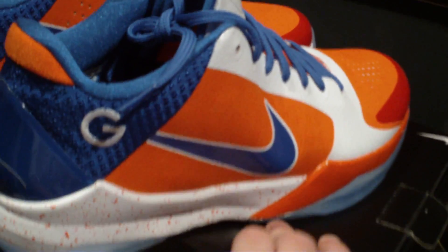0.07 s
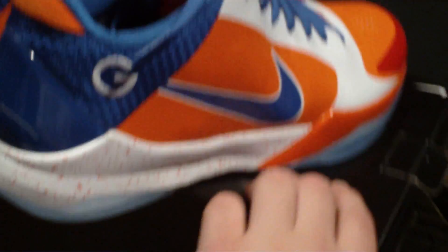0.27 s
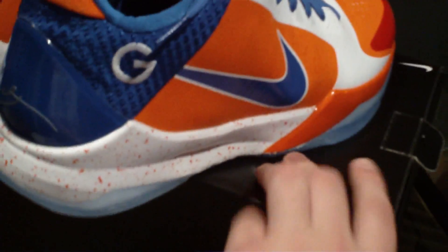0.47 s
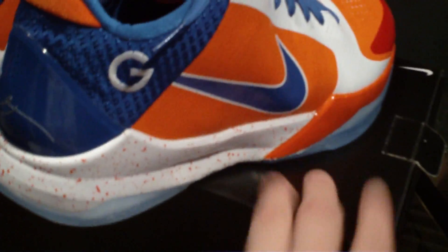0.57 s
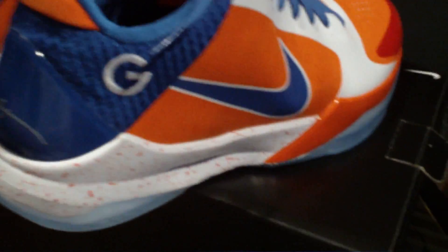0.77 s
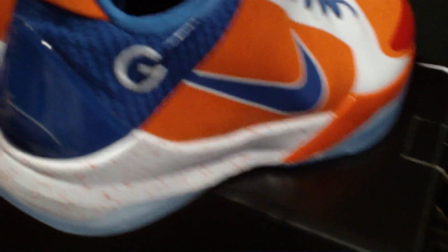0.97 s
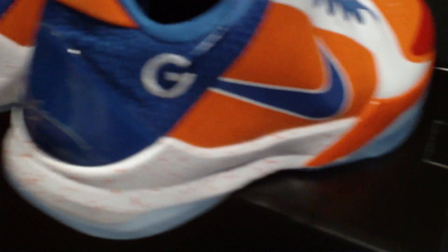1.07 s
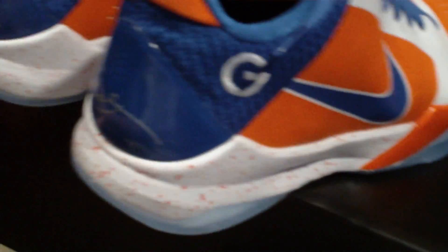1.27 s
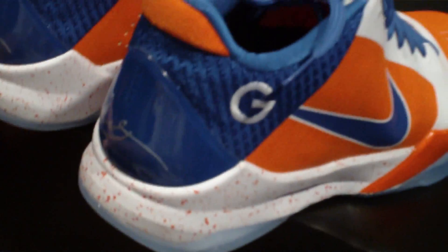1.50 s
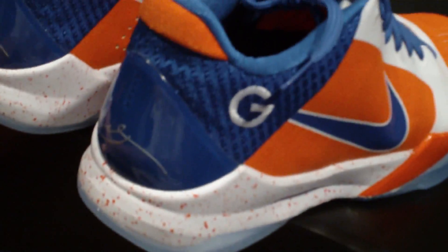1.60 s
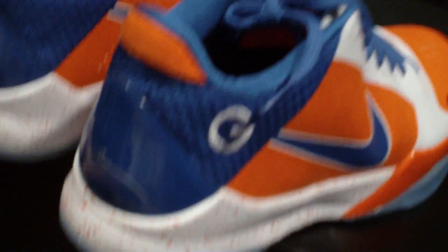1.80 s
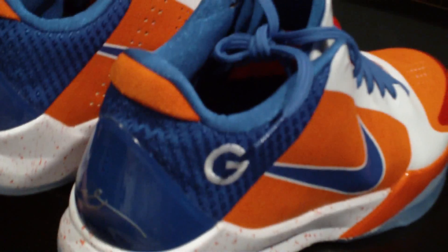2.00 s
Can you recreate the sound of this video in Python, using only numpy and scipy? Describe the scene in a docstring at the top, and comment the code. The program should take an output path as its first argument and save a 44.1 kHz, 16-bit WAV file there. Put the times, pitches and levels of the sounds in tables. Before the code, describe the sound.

Light hollow knocks and a brief rubbery scrape as a sneaker shifts on a cardboard box.

```python
"""A sneaker on a shoebox

A hand shifts and turns a sneaker on a hollow shoebox lid. Fingers bump the lid and make it ring.
The rubber sole catches, scrapes with a brief rough squeak and knocks down twice. Softer nudges
and rubs follow; each rub is thousands of tiny slips a second. Behind it all is a quiet room
with steady noise, hiss and the faint hum and whine of a fan."""
import sys
import numpy as np
from scipy import signal
from scipy.fft import rfft, irfft
from scipy.io import wavfile

SR = 44100
rng = np.random.default_rng(int(sys.argv[2]) if len(sys.argv) > 2 else 0)


def pcm_store(signal):
    """Save signal as 16-bit PCM."""
    levels = np.round(np.clip(np.atleast_2d(signal), -1, 1) * 32767)
    wavfile.write(sys.argv[1], SR, levels.astype(np.int16).T)


N = 90404
TIME = np.arange(N) / SR
JUDDER_PER_S = 140  # how fast the rubber's grip trembles


def from_db(db):
    """Turn decibels into a number to multiply by."""
    return 10 ** (np.asarray(db) / 20)


def unit_level(x):
    """Scale a sound so its average (rms) level is 1."""
    return x / np.sqrt(np.mean(x ** 2) + 1e-20)


def cut(x, hz, keep="low", order=2):
    """Keep the low or the high side of hz; a higher order cuts more steeply."""
    return signal.sosfilt(signal.butter(order, hz, keep, fs=SR, output="sos"), x + 1e-18)


def colour(x, spectrum):
    """Shape a sound's bass and treble with (pitch_hz, level_db) points, then set its level to 1."""
    hz, db = np.transpose(spectrum)
    bins = np.maximum(np.fft.rfftfreq(N, 1 / SR), 1)
    gains = from_db(np.interp(np.log(bins), np.log(hz), db))
    return unit_level(irfft(rfft(x) * gains, N))


def drift(per_s):
    """A smooth random wobble with a typical size of 1."""
    smoothing = 1 + (np.fft.rfftfreq(N, 1 / SR) / per_s) ** 2
    return unit_level(irfft(rfft(rng.standard_normal(N)) / smoothing, N))


def ring(x, hz, fade_s):
    """Each click in x rings as one pure tone that drops 60 dB in fade_s."""
    decay, angle = from_db(-60 / (fade_s * SR)), 2 * np.pi * hz / SR
    return signal.lfilter([0, np.sin(angle)], [1, -2 * decay * np.cos(angle), decay ** 2], x + 1e-18)


def dying_noise(fade_s):
    """A burst of noise that drops 60 dB in fade_s."""
    return rng.standard_normal(N) * np.exp(-np.minimum(np.log(1000) * TIME / fade_s, 50))


def stroke(start_s, length_s, rise_s=0.0032, fall_s=0.0092):
    """The loudness of one rub: it rises, holds and dies away."""
    rise = np.clip((TIME - start_s) / rise_s, 0, 1)
    return rise * np.exp(-np.maximum(TIME - start_s - length_s, 0) / fall_s)


def small_lid(x):
    """The lid is too small to give off much deep bass."""
    return cut(x, 166, "high", order=3)


# The low tones of the whole lid flexing: pitch_ratio, level_db, fade_s
FLEX_TONES = [(1, -1.5, 0.072), (1.42, -9.5, 0.058)]
# The higher tones of its stiff panel: pitch_hz, level_db, fade_s
PANEL_TONES = [(396, -8.5, 0.045), (577, -14.5, 0.057), (763, -6.5, 0.044), (896, -5.5, 0.019),
               (1062, -11, 0.032), (1430, -19, 0.045), (1590, -3.5, 0.012), (1728, -11.5, 0.0096),
               (1942, -11, 0.031), (2510, -4, 0.015)]
# The sole or fingers hit the lid; the last three levels are relative to level_db:
# start_s, level_db, brightness_hz, thump_hz, thump_db, tick_db, spot_hz, spot_db
KNOCKS = [(0.2289, -28.5, 1660, 300, -1.5, -30, 703, -9), (0.2867, -54.5, 3050, 293, -16, 17.5, 1460, 0),
          (0.5317, -36.5, 511, 259.5, 2, -30, 580, -4), (0.5385, -38, 416, 174, 7.5, -27, 402, -2.5),
          (0.6421, -23.5, 2780, 320, -8, -4, 797, -4), (0.6449, -33.5, 1780, 191, 3.5, -3, 854, -4),
          (0.7070, -32, 700, 282, 5.5, -24, 1100, -2), (0.7309, -43, 3000, 245, -22, 2, 3140, 6),
          (0.7360, -25, 2980, 178.4, 3.5, 1.5, 1655, -1), (0.7443, -37, 1800, 229, 3.5, -2, 1600, -6),
          (0.7786, -27.5, 910, 217, 6, -9, 710, -12), (1.2769, -39, 1600, 120, 4.5, -2, 1034, 1),
          (1.2815, -44.5, 1300, 300, -9, -12, 400, 1), (1.346, -46, 500, 285, 9.5, -15, 385, -7),
          (1.3565, -41, 900, 274, 4.5, -12, 910, -2), (1.7317, -44.5, 2480, 187, 1, 6.5, 1010, -3.5),
          (1.9103, -33.5, 690, 199, -5.5, -22, 713, -5.5)]
def knocks(crack_db=5.5, snap_db=9):
    """Each blow cracks, flexes the lid, rings its panel and the struck spot, and ticks on the surface."""
    out, click = np.zeros(N), signal.unit_impulse(N)
    for start_s, level_db, brightness_hz, thump_hz, thump_db, tick_db, spot_hz, spot_db in KNOCKS:
        push = cut(click, brightness_hz, order=1)  # a softer touch is duller
        thump = sum(from_db(db) * ring(push, ratio * thump_hz, fade_s)
                    for ratio, db, fade_s in FLEX_TONES)
        panel = sum((-1) ** (k // 2) * from_db(db) * ring(push, hz, fade_s)
                    for k, (hz, db, fade_s) in enumerate(PANEL_TONES))
        spot = from_db(crack_db) * push + from_db(spot_db) * ring(push, spot_hz, fade_s=0.046)
        tick = from_db(snap_db) * click + dying_noise(fade_s=0.022)
        tick = cut(cut(tick, 2530, "high", order=1), 8700)
        knock = small_lid(panel + spot + from_db(thump_db) * thump) + from_db(tick_db) * tick
        start = int(start_s * SR)
        out[start:] += from_db(level_db) * knock[:N - start]
    return out


def slips(per_s=5000, spread_db=2.5, judder_db=2.05):
    """Rubber crosses cardboard in tiny, uneven slips, bunched together as its grip trembles."""
    sizes_db = spread_db * np.minimum(rng.exponential(1, N), 3.3) + judder_db * drift(JUDDER_PER_S)
    return from_db(sizes_db) * rng.choice([-1, 1], N) * (rng.random(N) < per_s / SR)


# The tone colours of rubbing, one coarse and one fine: pitch_hz, level_db
RASP_COLOUR = [(60, -60), (150, -21), (550, -7.5), (760, -3), (1750, -2.5), (2600, -7), (3250, -11),
               (5700, -8.5), (7000, -16), (10500, -43)]
FINE_HISS_COLOUR = [(800, -47), (2500, 3), (4600, 3), (5600, 7.5), (9400, 2.5), (10800, -12)]
# The hand brushes faintly over the lid, mostly in the first second: time_s, level_db
HAND_BRUSH = [(0, -56.5), (0.4, -53), (0.6, -57), (0.9, -54), (1.1, -66.5), (2.05, -75)]
# The sole or the hand slides: start_s, length_s, rasp_db, hiss_db, rumble_db
SLIDES = [(0.26, 0.077, -56.5, -64, -51.5), (0.619, 0.009, -47.5, -82, -48.5),
          (0.64, 0.083, -38.5, -49.5, -44), (0.737, 0.013, -50, -43, -68), (0.773, 0.017, -47, -44, -58),
          (0.798, 0.041, -64, -46.5, -53), (1.269, 0.03, -49.5, -49.5, -57), (1.324, 0.061, -58, -58, -49),
          (1.723, 0.094, -58.5, -54, -65)]
def slides(flex_hz=257):
    """Tiny slips rasp and hiss where the surfaces touch, and make the lid rumble."""
    rasp, hiss = colour(slips(), RASP_COLOUR), colour(slips(), FINE_HISS_COLOUR)
    drag = small_lid(cut(slips(), 335))
    lid_tones = [(ratio * flex_hz, db, fade_s) for ratio, db, fade_s in FLEX_TONES] + PANEL_TONES
    rumble = unit_level(sum(from_db(db) * ring(drag, hz, fade_s) for hz, db, fade_s in lid_tones))
    out = cut(rasp, 3240) * from_db(np.interp(TIME, *np.transpose(HAND_BRUSH)))
    for start_s, length_s, rasp_db, hiss_db, rumble_db in SLIDES:
        rub = from_db(rasp_db) * rasp + from_db(hiss_db) * hiss + from_db(rumble_db) * rumble
        out += stroke(start_s, length_s) * rub
    return out


# The rubber grips and squeaks during the main scrape: start_s, length_s, pitch_hz, level_db
SQUEAKS = [(0.649, 0.018, 1500, -37), (0.682, 0.015, 1535, -33.5)]
def squeaks(rise_hz_per_s=1500, waver=0.015, rough_db=5):
    """The slips lock into a rough, wavering tone that rises as the rubber stretches."""
    out = np.zeros(N)
    for start_s, length_s, pitch_hz, level_db in SQUEAKS:
        rising_hz = pitch_hz + rise_hz_per_s * np.clip(TIME - start_s, 0, length_s)
        hz = rising_hz * (1 + waver * drift(per_s=174))
        tone = np.sin(2 * np.pi * np.cumsum(hz) / SR)
        rough_tone = unit_level(tone * from_db(rough_db * drift(JUDDER_PER_S)))
        out += from_db(level_db) * stroke(start_s, length_s) * rough_tone
    return out


# The tones the rubber sole rings with: pitch_hz, level_db, fade_s
SOLE_TONES = [(1526, 1, 0.026), (1760, -5, 0.02), (2520, -12, 0.0056), (3800, -8.5, 0.013),
              (5750, -6, 0.0045), (8520, -4, 0.0083)]
def chatter(start_s=0.644, length_s=0.055, per_s=500, jitter=0.5, spread_db=2, gain_db=-34):
    """In the main scrape the tread catches and lets go unevenly; each release rings the sole."""
    gaps, sizes, signs = rng.standard_normal((200, 3)).T
    times_s = start_s + np.cumsum(np.exp(jitter * gaps)) / per_s
    strengths = from_db(spread_db * np.clip(sizes, -1, 1)) * np.sign(signs)
    clicks = np.bincount((times_s * SR).astype(int), strengths, N)[:N]
    sole = sum((-1) ** k * from_db(db) * ring(clicks, hz, fade_s)
               for k, (hz, db, fade_s) in enumerate(SOLE_TONES))
    return from_db(gain_db) * stroke(start_s, length_s) * sole


# The tread skims over the lid: start_s, length_s, pitch_hz, level_db
SWISHES = [(0.694, 0.072, 8500, -47.5), (0.801, 0.032, 7740, -52), (1.345, 0.028, 8200, -49.5),
           (1.783, 0.028, 3490, -55)]
def swishes(width_ratio=0.22):
    """Fine slips gathered around one high pitch make a thin swish."""
    out = np.zeros(N)
    for start_s, length_s, pitch_hz, level_db in SWISHES:
        edges_hz = pitch_hz * np.exp(np.array([-.5, .5]) * width_ratio)
        band = signal.butter(2, edges_hz, "band", fs=SR, output="sos")
        swish = unit_level(signal.sosfilt(band, slips()))
        out += from_db(level_db) * stroke(start_s, length_s) * swish
    return out


def echoes(x, level_db=-16.5, delay_s=0.0022):
    """A furnished room sends back a short, dull wash of echoes."""
    tail = cut(dying_noise(fade_s=0.21) * (TIME > delay_s), 5000, order=1)
    return from_db(level_db) * signal.fftconvolve(x, tail / np.sqrt(np.sum(tail ** 2)))[:N]


# The tone colour of the room's noise: pitch_hz, level_db
ROOM_COLOUR = [(25, -26), (55, -9.5), (85, -10), (140, -1), (300, 0), (520, -4.5), (1000, -10),
               (1550, -12.5), (2400, -14.5), (3700, -11.5), (4700, -14.5), (7000, -12), (9500, -16),
               (10800, -23.5)]
# How the hissy top of that noise swells and eases: time_s, change_db
HISS_SWELL = [(0, -6), (0.22, -1.5), (0.5, 1), (1.5, 0.1), (2.05, -2)]
def room_noise(level_db=-50.5):
    """A steady low rush, with a hiss above it that slowly changes in loudness."""
    noise = from_db(level_db) * colour(rng.standard_normal(N), ROOM_COLOUR)
    low = cut(noise, 2600, order=1)
    hiss = (noise - low) * from_db(np.interp(TIME, *np.transpose(HISS_SWELL)))
    return low + hiss


def fan(hum_hz=239.7, hum_width_hz=9, hum_db=-64.5, whine_hz=645.5, whine_db=-60.5):
    """The fan's low hum is a narrow band of noise; its whine is a wavering tone."""
    phase = 2 * np.pi * hum_hz * TIME
    hum = unit_level(drift(hum_width_hz) * np.cos(phase) + drift(hum_width_hz) * np.sin(phase))
    wavering_hz = whine_hz + 3.15 * drift(per_s=18.4)
    flutter_db = 1.3 * drift(per_s=9.6)
    whine = unit_level(np.sin(2 * np.pi * np.cumsum(wavering_hz) / SR) * from_db(flutter_db))
    return from_db(hum_db) * hum + from_db(whine_db) * whine


def scene(side_db=-70.5):
    """Everything sits in the centre; only a trace of hiss differs between left and right."""
    shoe = knocks() + slides() + squeaks() + chatter() + swishes()
    side_hiss = cut(cut(rng.standard_normal(N), 6600), 310, "high", order=1)
    sides = from_db(side_db) * unit_level(side_hiss) * np.array([[1], [-1]])
    return shoe + echoes(shoe) + room_noise() + fan() + sides


def record(dry):
    """Cut the treble steeply above 10,700 Hz."""
    return signal.sosfilt(signal.ellip(12, .2, 80, 10700, fs=SR, output="sos"), dry)


dry = scene()
out = record(dry)
pcm_store(out)
```